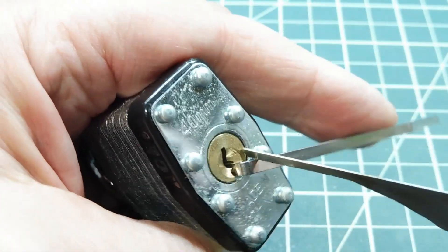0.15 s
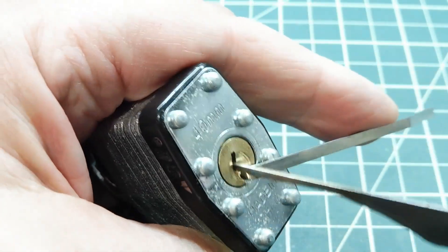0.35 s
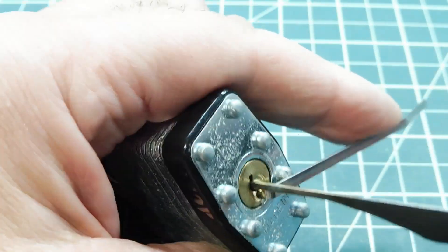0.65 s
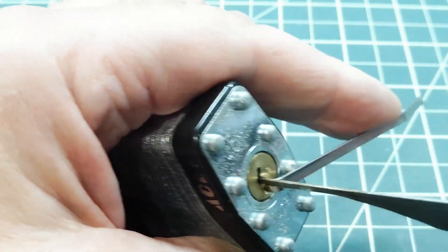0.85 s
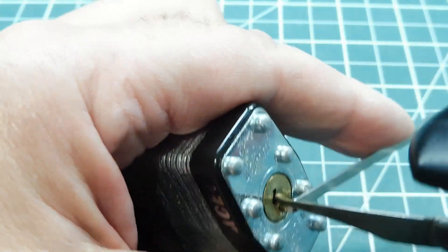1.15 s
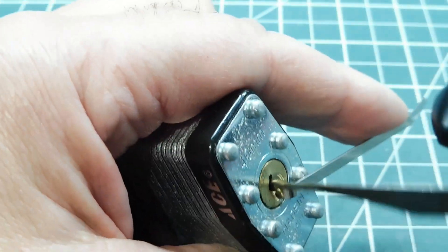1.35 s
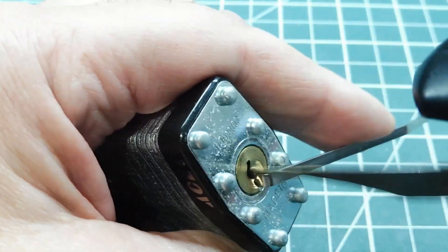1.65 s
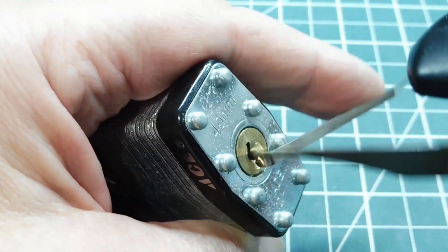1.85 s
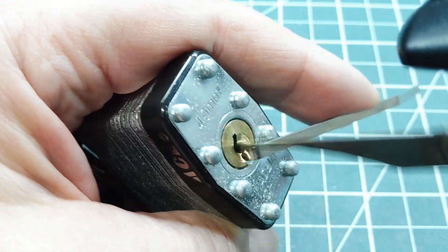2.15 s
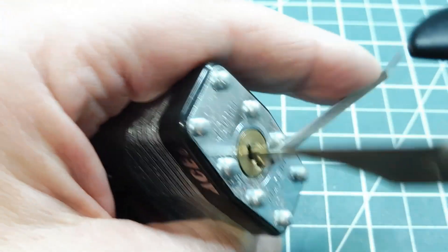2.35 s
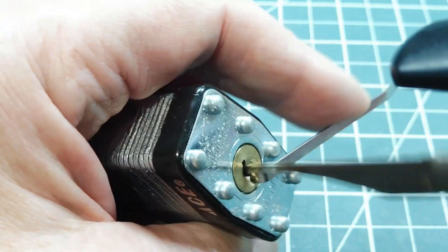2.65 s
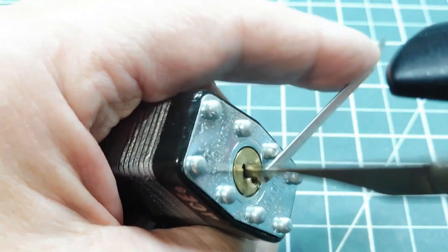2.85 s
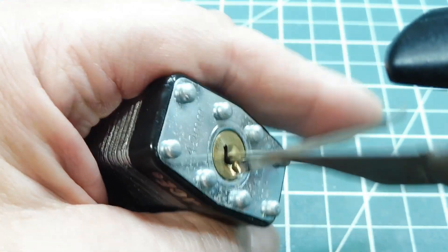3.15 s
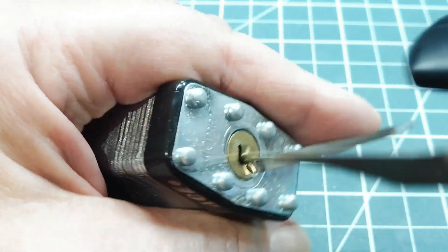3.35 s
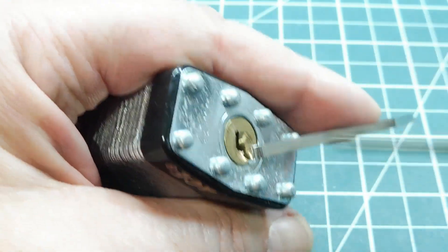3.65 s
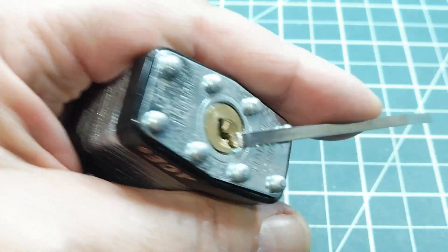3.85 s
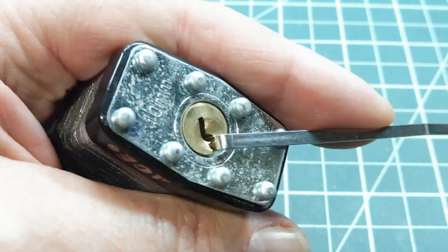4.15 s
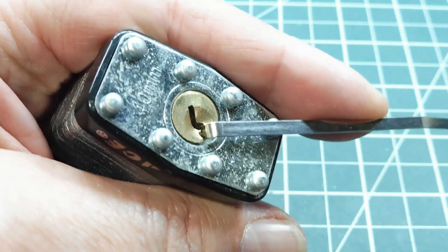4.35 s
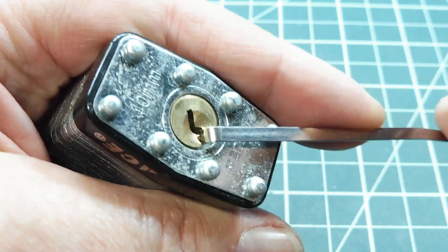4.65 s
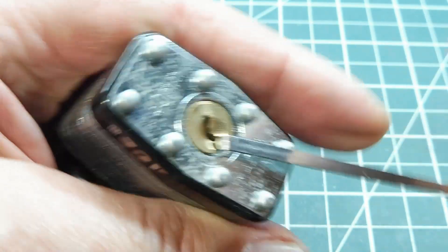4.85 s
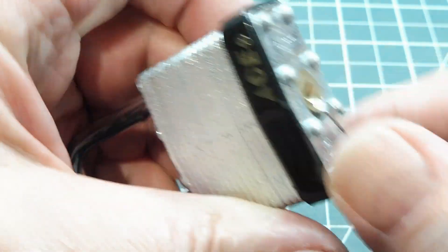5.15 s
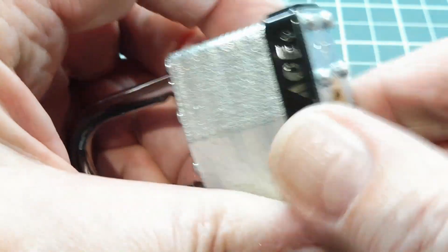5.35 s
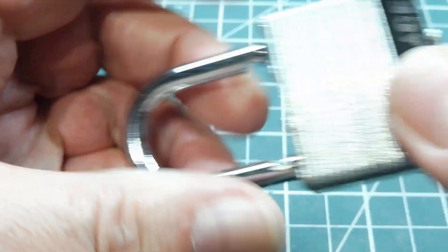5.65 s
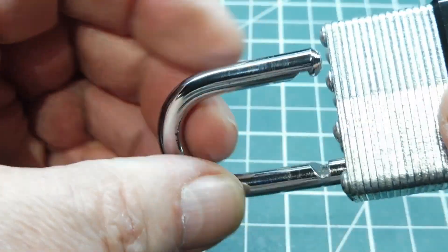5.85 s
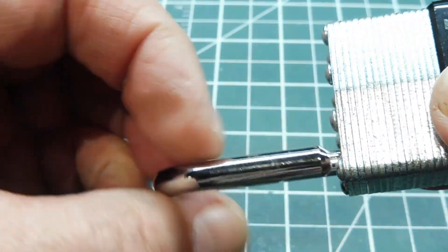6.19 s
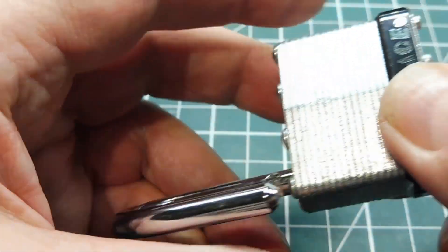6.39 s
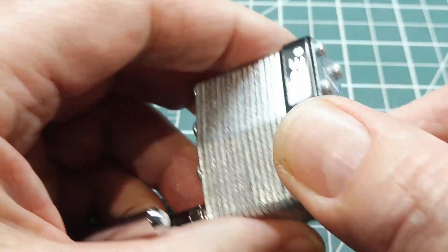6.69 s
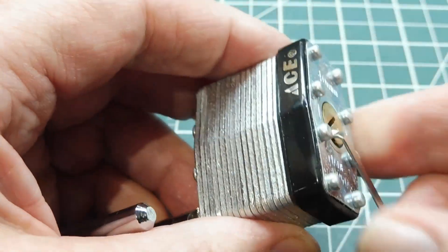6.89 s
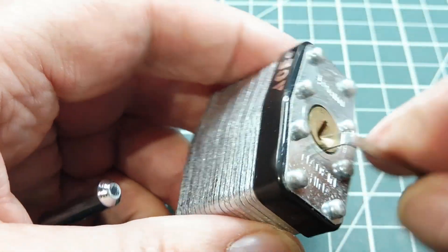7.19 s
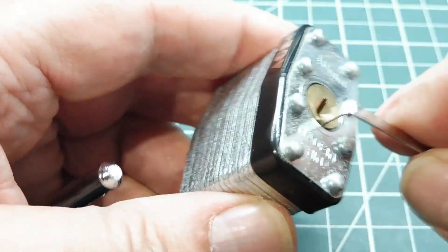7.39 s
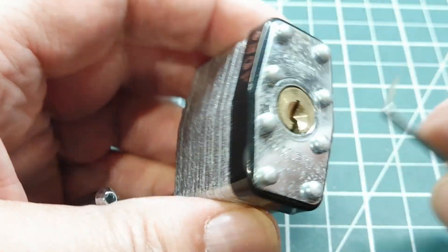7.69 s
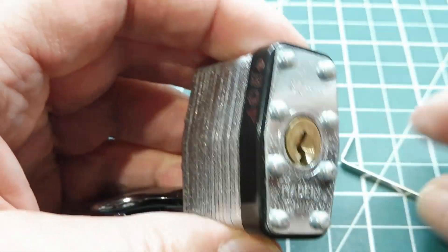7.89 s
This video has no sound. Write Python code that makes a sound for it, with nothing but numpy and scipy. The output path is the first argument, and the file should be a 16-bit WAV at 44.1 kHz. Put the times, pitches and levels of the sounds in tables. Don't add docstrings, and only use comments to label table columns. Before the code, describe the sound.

Close up in a small quiet room with soft hiss, light metal ticks come from a hand-held padlock. A small motor catches and drives a blade in the keyway with a harsh, rattling metallic buzz for about two seconds. The blade snaps out loudly, the motor ticks down to a stop, the tool bounces on a desk, and after a long pause a thin steel bar drops.

```python
import sys
import numpy as np
from scipy import signal
from scipy.fft import rfft, irfft
from scipy.io import wavfile
from scipy.ndimage import uniform_filter1d

SR = 44100
rng = np.random.default_rng(int(sys.argv[2]) if len(sys.argv) > 2 else 0)


def boost_factor(decibels):
    exponent = np.asarray(decibels, float) / 20
    return 10 ** exponent


def waveform_to_disk(signal):
    frames = np.transpose(np.atleast_2d(signal))
    scaled = np.clip(frames, -1, 1) * 32767
    samples = np.round(scaled).astype(np.int16)
    wavfile.write(sys.argv[1], SR, samples)


N = 354078


def level(x, db):
    return x * boost_factor(db) / np.sqrt(np.mean(x ** 2))


def even(x):
    return x / np.sqrt(np.abs(uniform_filter1d(x ** 2, size=3000)) + 1e-12)


def ring(x, hz, width_hz):
    return signal.lfilter(*signal.iirpeak(hz, hz / width_hz, fs=SR), x)


def ring_twice(x, hz, width_hz):
    return ring(ring(x, hz, width_hz), hz, width_hz)


def body(x, modes):
    return sum((-1) ** k * boost_factor(db) * ring(x, hz, width_hz) for k, (hz, width_hz, db) in enumerate(modes))


def steep(x, modes):
    return sum((-1) ** k * boost_factor(db) * ring_twice(x, hz, 1.56 * width_hz)
               for k, (hz, width_hz, db) in enumerate(modes))


def walk(rate_hz):
    hold = int(SR / rate_hz)
    steps = np.repeat(rng.standard_normal(N // hold + 1), hold)
    return 0.812 * uniform_filter1d(uniform_filter1d(steps, hold), hold)[:N]


def smooth_gate(is_open):
    return uniform_filter1d(is_open * 1., size=200)


def curves(table):
    s, *columns = np.transpose(table)
    t = np.arange(N) / SR
    gate = smooth_gate((t > s[0]) & (t < s[-1]))
    return gate, *(np.interp(t, s, c) for c in columns)


def ticks(events, modes, broad, top_hz, soft_s, snap=4.6):
    out, t = np.zeros(N), np.arange(11000) / SR
    edges = signal.butter(2, (1300, top_hz), "bandpass", fs=SR)
    noises = rng.standard_normal((len(events), len(t)))
    for (start_s, peak_db, hz, body_db, t60_s), noise in zip(events, noises):
        burst = noise * np.exp(-np.log(1000) * t / t60_s) + snap * (t == 0)
        crack = ring_twice(burst, hz, .5 * hz) + broad * signal.lfilter(*edges, burst)
        thud = body((1 + 0.62 * noise) * np.exp(-t / soft_s), modes)
        sound = crack / np.abs(crack).max() + boost_factor(body_db) * thud / np.abs(thud).max()
        i = int(start_s * SR)
        out[i:i + len(t)] += (boost_factor(peak_db) * sound)[:N - i]
    return out


def light(events, body_db, thinning, t60_s):
    return [(s, db, hz, body_db - thinning * (db + 22.5), t60_s) for s, db, hz in events]


# freq_hz, density_db
HISS_SPECTRUM = [(15, -39.5), (25, -14), (75, -2), (135, -3), (240, 1), (552, 1.5), (1000, -0.5),
                 (1200, -6.5), (1780, -4), (4080, -10.5), (5030, -6.5), (6030, -14), (7820, -10),
                 (11600, -16), (12500, -20), (16200, -49.5), (22000, -120)]
HISS_DB = -51


def hiss():
    hz, db = np.transpose(HISS_SPECTRUM)
    shape = boost_factor(np.interp(np.log(np.fft.rfftfreq(N, 1 / SR) + 1), np.log(hz), db))
    return level(irfft(rfft(rng.standard_normal(N)) * shape, N), HISS_DB) * boost_factor(.5 * walk(4.7))


# freq_hz, width_hz, level_db
LOCK = [(557, 197, 2), (980, 350, 5)]
# start_s, peak_db, ring_hz
FIDDLE = [(0.2329, -36.5, 2010), (0.2614, -26, 3100), (0.2714, -41.5, 4690), (0.2957, -35, 3990),
          (0.3244, -37, 2090), (0.38, -38.5, 4120), (0.394, -31.5, 2060), (0.406, -30, 2580),
          (0.4618, -34, 3330), (0.5838, -31, 3930), (0.601, -26.5, 4170), (0.6183, -20, 3980),
          (0.7931, -41.5, 3040), (0.8737, -35, 2900), (0.8929, -27.5, 2910), (1.0121, -37.5, 3460),
          (1.0914, -35.5, 2060)]


def fiddle():
    events = light(FIDDLE, body_db=-9, thinning=0.24, t60_s=0.03)
    return ticks(events, LOCK, broad=0.77, top_hz=8100, soft_s=0.0017, snap=1.2)


STOP_S, BRAKING_HZ_PER_S = 3.9347, 321
LAST_TURN, BACK_TURN = .693, .59
CAM_DB, CAM_FADE_DB, CAM_HZ, BACK_DB, BACK_HZ = -11, -8.5, 3880, -8.5, 5000
SKIM_DB_PER_TURN = -1.5


def slowing():
    rows, turns = [], np.arange(15)
    for k, (a, b) in zip(turns, rng.standard_normal((len(turns), 2))):
        blow = (k + LAST_TURN, 1.8 * a, CAM_HZ)
        back = (k + LAST_TURN + BACK_TURN - 1, BACK_DB + 2.7 * b, BACK_HZ)
        for left, db, hz in (blow, back):
            start_s = STOP_S - np.sqrt(2 * left / BRAKING_HZ_PER_S)
            fade_db = CAM_FADE_DB * np.exp(-left / 2.5)
            skim_db = SKIM_DB_PER_TURN * max(left - 7.5, 0)
            rows.append((start_s, CAM_DB + fade_db + skim_db + db, hz))
    return rows


# start_s, peak_db, ring_hz
SETTLE = [
    (1.263, -36, 2700),
    (1.295, -33, 2800),
    (1.312, -7, 2960),
    (1.33, -16.5, 4420),
    (1.341, -11, 4500),
    (1.348, -13.5, 5000),
    (3.634, -10, 3045),
    (3.948, -29, 2720),
    (3.976, -33, 5030),
]


def cam_knocks():
    events = light(slowing() + SETTLE, body_db=-10, thinning=0.22, t60_s=0.018)
    return ticks(events, LOCK, broad=0.63, top_hz=8840, soft_s=0.00074)


# time_s, cam_hz, pin_contact_db, housing_grip_looseness_db, free_blade_db
MOTOR = [(1.5, 116.9, -17, 1.5, -4.5), (1.7, 116.8, -14.5, 4, 1), (1.81, 121.8, -15.5, 0.5, -4),
         (1.9, 116.5, -16.5, -6, 0), (2.08, 116.8, -13.5, 5.5, -1.5), (2.2, 120.3, -15.5, -0.5, 0.5),
         (2.3, 119, -15.5, 2.5, 0.5), (2.44, 114.6, -14, -0.5, -3.5), (2.59, 116.3, -16, 0, 0),
         (2.63, 118.3, -17, 7, -1.5), (2.7, 116, -19.5, 10.5, -0.5), (2.852, 120.6, -22, 2.5, -0.5),
         (2.872, 119.1, -15, 0, -3), (3.0, 117.5, -15.5, 5.5, 0), (3.18, 121.6, -14, -2.5, -2),
         (3.22, 121.3, -11, -1, 1.5), (3.42, 115.3, -10.5, -0.5, -0.5), (3.57, 121, -15, 0, -4)]
SWITCH_ON_S, STALL_SHARE, SPIN_UP_S, SPIN_UP_SHAPE = 1.307, .48, .095, 1.5
BITE_POWER = 2.33
HOUSING_DB, CASING_DB, BLADE_DB, MEAN_CONTACT_DB = -27, -23, -5.5, -16
CASING_FOLLOWS = 0.69
LOOSE, LOOSE_PER_DB = 0.25, 0.07
REBOUND, REBOUND_PER_DB, REBOUND_DRIFT = .38, .045, .13


def motor():
    _, hz, contact, grip, free = curves(MOTOR)
    since_s = np.arange(N) / SR - SWITCH_ON_S
    gate = smooth_gate((since_s > 0) & (since_s < MOTOR[-1][0] - SWITCH_ON_S))
    speed = 1 - STALL_SHARE * np.exp(-(np.maximum(since_s, 0) / SPIN_UP_S) ** SPIN_UP_SHAPE)
    bite = 20 * BITE_POWER * np.log10(speed)
    firm = contact - MEAN_CONTACT_DB
    housing_db = HOUSING_DB + grip + 0.73 * bite
    casing_db = CASING_DB + CASING_FOLLOWS * firm + 1.15 * bite
    blade_db = BLADE_DB + contact + free + 0.85 * bite
    loose = LOOSE + LOOSE_PER_DB * firm
    rebound = REBOUND - REBOUND_PER_DB * (firm + bite) + REBOUND_DRIFT * walk(11)
    return gate, hz * speed, housing_db, casing_db, blade_db, contact + bite, loose, rebound


def strikes(turns, scatter_db, late_s):
    whole = np.arange(1, int(turns.max()))
    chance = rng.standard_normal((N // 100, 2))[:len(whole)].T
    at = np.interp(whole, turns, np.arange(N)) + late_s * SR * chance[0]
    out, i = np.zeros(N), at.astype(int)
    gain = boost_factor(scatter_db * chance[1])
    np.add.at(out, i, gain * (1 - at + i))
    np.add.at(out, i + 1, gain * (at - i))
    return out


def habitual(hits, fall, hold=2560):
    out = np.zeros(N + 3 * hold)
    fade = np.sin(np.pi * np.arange(2 * hold) / (2 * hold))
    starts = np.arange(0, N - 2 * hold, hold)
    habits = rng.standard_normal((len(starts), len(fall))) * fall
    for i, habit in zip(starts, habits):
        answer = signal.fftconvolve(hits[i:i + 2 * hold] * fade, habit)
        out[i:i + len(answer)] += answer
    return out[:N]


# turn_multiple, level_db
IMBALANCE = [(1, -60.5), (2, -53.5), (3, -51), (4, -61)]
# freq_hz, width_hz, level_db
HOUSING = [(502, 39, -13.5), (606.5, 16, 1), (707, 55, 6.5)]
CASING = [(820.8, 31, 0), (966, 58, -1), (1063, 29, -3.5), (1171, 89, -8), (1293, 153, -3),
          (1391, 88, -7.5), (1527, 17, -8.5), (1672, 102, -10)]
BLADE = [(1825, 93, -14), (2134, 380, 0.5), (2190, 460, 2.5)]
PINS = [(3080, 430, 0), (3730, 1340, 4), (4270, 780, -1.5), (5122, 1320, 1), (6520, 2900, -9.5),
        (6800, 2120, -8.5), (9080, 3530, -9), (10900, 680, -11.5)]


def pick():
    gate, cam_hz, housing_db, casing_db, blade_db, pins_db, loose, rebound = motor()
    turns = np.cumsum(cam_hz) / SR + 0.0183 * walk(25)
    blow = strikes(turns, scatter_db=1, late_s=.00002)
    back = strikes(turns - .5 - 0.016 * walk(9), scatter_db=0.0, late_s=.00006)
    hits = blow + np.clip(rebound, 0, 1) * back
    t = np.arange(700) / SR
    fall = np.exp(-t / 0.0029) * (1 - np.exp(-t / 0.0002))
    repeat = even(habitual(hits, fall))
    chatter = signal.oaconvolve(hits, fall)[:N] + .08
    grit = even(chatter * rng.standard_normal(N) * boost_factor(3 * walk(1500)))
    blow, loose = even(blow), np.clip(loose, 0, 1)
    shake = np.sqrt(1 - loose) * blow + np.sqrt(loose) * grit
    rattle = .7 * repeat + .55 * grit + .45 * blow
    out = np.zeros(N)
    for k, db in IMBALANCE:
        swing = boost_factor(db + 3.1 * walk(12.0)) * (cam_hz / 118) ** (4 * k - 3)
        out += swing * np.sin(2 * np.pi * k * turns)
    for drive, modes, db, grip_db in ((shake, HOUSING, housing_db, 3.5), (shake, CASING, casing_db, 5.5),
                                      (rattle, BLADE, blade_db, 2.5), (rattle, PINS, pins_db, 1.5)):
        out += boost_factor(db) * even(sum(boost_factor(grip_db * walk(13)) * steep(drive, [mode]) for mode in modes))
    return gate * out


# time_s, level_db
COAST = [(3.56, -29.5), (3.704, -36), (3.862, -41.5), (3.98, -81)]


def coast():
    gate, db = curves(COAST)
    noise = rng.standard_normal(N) * boost_factor(4.2 * walk(450))
    low = level(steep(noise, HOUSING + CASING), 0)
    high = level(steep(noise, BLADE + PINS), 0.69)
    return gate * boost_factor(db) * level(low + high, 0)


# start_s, peak_db, ring_hz, body_minus_tick_db, t60_s
PULLED = [
    (3.571, 2.9, 2820, -6.5, 0.057),
    (3.593, 6.4, 3080, -7, 0.029),
]


def pulled():
    return ticks(PULLED, LOCK, broad=0.52, top_hz=7400, soft_s=0.00055)


# freq_hz, width_hz, level_db
DESK = [(122.4, 23, -1.5), (216.2, 7, 10.5), (234, 40, 3.5), (310.5, 17, 6), (357, 11, 7), (376, 16, 6),
        (428, 7.8, 5.5), (502, 33, 11), (615, 220, 2.5), (850, 310, 0)]
# start_s, peak_db, ring_hz, thud_minus_tick_db, t60_s
TOUCH = [
    (4.2237, -11, 2060, -16.5, 0.009),
    (4.2385, -22, 1670, -9.5, 0.015),
    (4.2628, -24, 2050, -16, 0.0191),
    (4.2994, -15, 2150, -17, 0.024),
]


def touch():
    return ticks(TOUCH, DESK, broad=0.563, top_hz=5500, soft_s=0.0061)


# start_s, peak_db, ring_hz, thud_minus_tick_db, t60_s
LAID = [
    (4.4529, -2.5, 1970, -2.5, 0.053),
    (4.4765, -15, 1710, -1.5, 0.087),
    (4.5111, -13.5, 2140, 4, 0.075),
    (4.5562, -27.5, 1760, 9, 0.038),
]


def laid():
    return ticks(LAID, DESK, broad=0.39, top_hz=6100, soft_s=0.00019)


# start_s, peak_db, ring_hz
BAR = [(5.679, -32.5, 1780), (7.055, -29, 1900), (7.068, -21.5, 1480), (7.073, -23, 1880),
       (7.083, -24, 1960), (7.827, -28, 1930), (7.842, -25, 2860), (7.859, -17, 3300), (7.868, -2.5, 3020),
       (7.873, -7, 2200), (7.88, -13, 2070), (7.893, -10, 3220), (7.906, -11, 3120), (7.914, -18, 3630),
       (7.927, -22, 2250), (7.936, -23.5, 1920)]


def bar():
    events = light(BAR, body_db=-21, thinning=0.16, t60_s=0.019)
    return ticks(events, LOCK, broad=0.36, top_hz=8900, soft_s=0.00021, snap=5.5)


def room(near, t60_s=0.3, wet_db=-14.5):
    t = np.arange(SR // 2) / SR
    tail = ring(rng.standard_normal(len(t)), 1430, 6000) * np.exp(-np.log(1000) * t / t60_s) * (t > .003)
    wet = signal.fftconvolve(near, tail / np.sqrt(np.sum(tail ** 2)))[:N]
    return near + boost_factor(wet_db) * wet


def scene():
    near = fiddle() + cam_knocks() + pick() + coast() + pulled() + touch() + laid() + bar()
    return room(near)[None]


# freq_hz, width_hz
NOTCHES = [(1200, 116), (5500, 374), (8280, 400), (8280, 220)]


def microphone_port(x):
    for hz, width_hz in NOTCHES:
        x = x - ring(x, hz, width_hz)
    return x


def early_noise(x, lead_s=.021, db=-17):
    ahead = int(lead_s * SR)
    spread = ring(rng.standard_normal(ahead) * np.linspace(0, 1, ahead), 3600, 11600)
    return boost_factor(db) * signal.fftconvolve(x[0], spread / np.sqrt(np.sum(spread ** 2)))[ahead - 1:]


def band_limit(x):
    return signal.sosfilt(signal.butter(12, 12640, fs=SR, output="sos"), x)


def record(dry):
    heard = microphone_port(dry)
    mix = np.clip(heard + early_noise(heard) + hiss(), -1, 1)
    return band_limit(mix)


dry = scene()
out = record(dry)
waveform_to_disk(out)
```